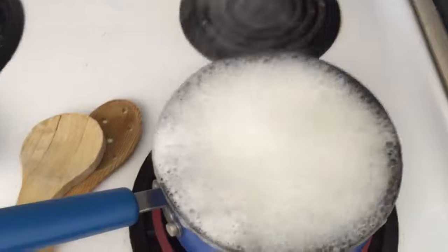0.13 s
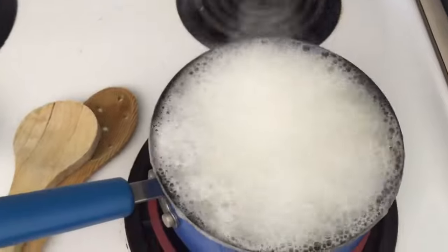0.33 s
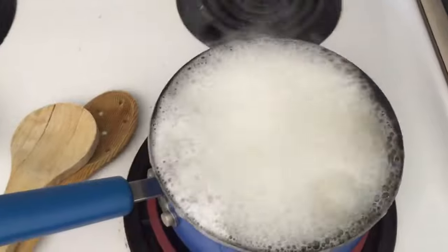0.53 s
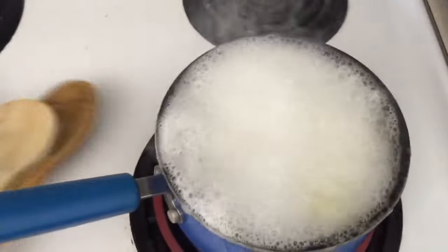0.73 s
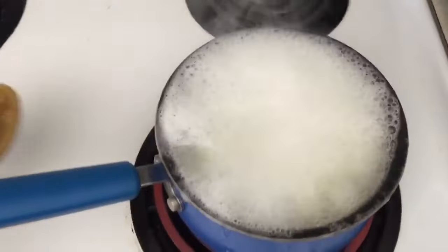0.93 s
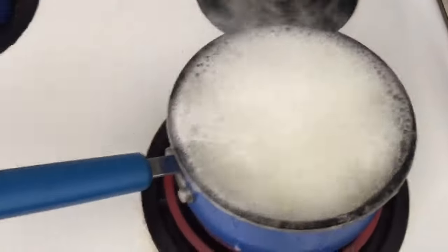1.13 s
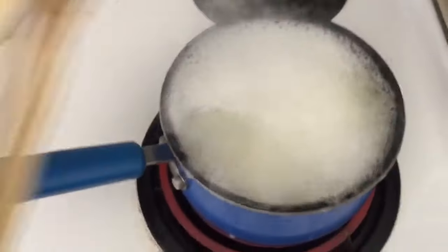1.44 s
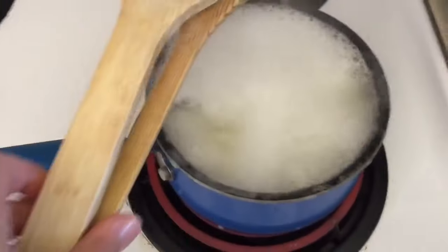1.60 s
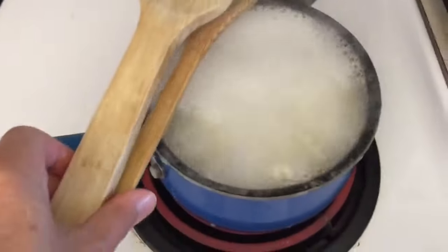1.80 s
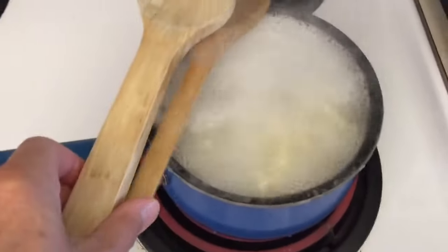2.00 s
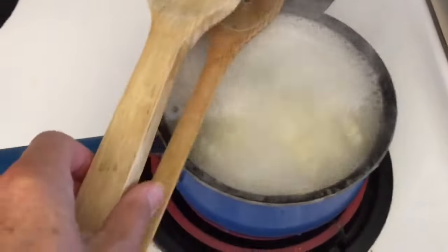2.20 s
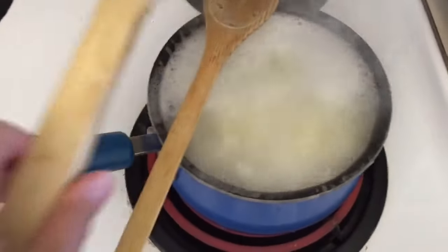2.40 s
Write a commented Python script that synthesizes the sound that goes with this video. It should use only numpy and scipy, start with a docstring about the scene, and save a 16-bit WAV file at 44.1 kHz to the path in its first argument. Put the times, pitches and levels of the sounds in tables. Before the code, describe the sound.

Hissing, fizzing pot on a stove, with a wooden spoon clack and a sharp rim knock.

```python
"""Foaming pot and wooden spoons

A pot of foaming liquid hisses with bursting bubbles and quietens as the foam sinks; under it an electric stove
hums and a fan whirs. Two wooden spoons scrape and clack on the stove top as they are picked up, then one knocks
down on the rim of the pot, and wood and pot ring briefly. A small kitchen answers the spoons; the sound is
close and mono."""
import sys
import numpy as np
from scipy import signal
from scipy.fft import rfft, irfft, next_fast_len
from scipy.io import wavfile
from scipy.ndimage import map_coordinates

SR = 44100
rng = np.random.default_rng(int(sys.argv[2]) if len(sys.argv) > 2 else 0)


def to_wav(s):
    """Save 16-bit WAV."""
    ch = np.atleast_2d(s).T  # columns
    pcm = np.round(np.clip(ch, -1, 1) * 32767)  # PCM
    wavfile.write(sys.argv[1], SR, pcm.astype(np.int16))


N = 112454

# The kitchen's decay. Each row: frequency in Hz, time to fall 60 dB in seconds.
ROOM_DECAY = [(150, 0.69), (1000, 0.34), (3000, 0.26), (10000, 0.14)]
# The fan's whine. Each row: pitch in Hz, rms level in dB.
FAN_WHINE = [(203, -61.5), (557, -64.5), (1115.5, -61.5)]
# Fades for the hum, its octave, the foam and the fizz. Each row: time in seconds, level in dB.
HUM_FADE = [(.12, -39), (.55, -38), (.68, -40), (.85, -37.5), (1.15, -38), (1.62, -36), (1.72, -38),
            (1.765, -56), (1.82, -56), (1.93, -52.5), (1.98, -73), (2.55, -73)]
OCTAVE_FADE = [(.12, -55), (.3, -55), (.55, -51.5), (.7, -57.5), (.95, -52.5), (1.35, -51.5), (1.55, -62),
               (2.4, -60.5)]
FOAM_FADE = [(.12, -39.5), (.5, -41.5), (.68, -41), (.85, -43.5), (1.15, -44.5), (1.4, -48), (1.6, -51),
             (1.8, -53.5), (2.1, -52), (2.36, -56), (2.55, -58)]
FIZZ_FADE = [(.12, -39.5), (.5, -40.5), (.75, -42), (1.15, -41.5), (1.4, -43), (1.6, -44.5), (1.8, -48),
             (2.1, -48), (2.36, -50), (2.55, -50)]
# EQ curves for the noise in each layer. Each row: frequency in Hz, relative level in dB.
FAN_EQ = [(20, -12), (50, -4), (110, 3), (180, 1), (260, -1), (380, -3.5), (480, -10), (570, -7),
          (740, -11), (860, -15.5), (970, -22.5), (1130, -1.5), (1400, -45.5), (2000, -11), (4000, -46)]
FOAM_EQ = [(200, -14.5), (520, -14.5), (650, -5.5), (760, -13.5), (880, -4.5), (990, -9), (1200, -5.5),
           (1550, -6.5), (1950, 1), (2250, -1.5), (2850, -7.5), (3400, -4), (4000, -8.5), (4420, -6),
           (5100, -14), (7000, -24), (16000, -40)]
FIZZ_EQ = [(1500, -16.5), (3500, -10), (5000, -5), (5600, 0), (6100, 0), (6900, 0), (7700, -4),
           (8400, -1.5), (9500, -2), (10350, -7), (11100, -3), (13000, -4), (15700, -6)]
SCRAPE_EQ = [(60, -19), (150, 4), (280, 2), (400, 4), (600, -0.5), (880, 0.5), (1150, 0), (1600, -0.5),
             (2200, -10), (3200, -19), (4200, -23), (5200, -30), (15000, -60)]
CLACK_EQ = [(60, -25), (160, -12.5), (420, -5), (680, -2.5), (1200, 4.5), (1800, 4.5), (2600, -4),
            (3600, -13), (5000, -22), (15000, -46)]
KNOCK_EQ = [(100, -28), (400, -16), (900, -5.5), (1600, -11), (2500, -4.5), (3200, -8), (3700, -6),
            (4400, -7), (5100, -17), (6000, -10), (7000, -15), (7700, -20), (8600, -17.5), (10000, -24.5),
            (15500, -36)]
# The ring of spoon on stove top, and of spoon and pot together. Each row: pitch in Hz, relative level in dB,
# time to fall 60 dB in seconds.
WOOD_MODES = [(409, -18, 0.19), (494, -24, 0.25), (840, -7, 0.063), (995, -17, .1), (1120, -14, .12),
              (1176, -10.5, 0.092), (1290, -7.5, 0.029), (1496.4, -3, .11), (1754, -12, .1),
              (1946, -26, .08), (2449, -12, 0.065), (2790, -23, .04), (3205, -16, 0.057)]
RIM_MODES = [(383.5, -27, 0.34), (880, -16, 0.24), (1022, -27, 0.23), (1280, -30, 0.071), (1550, -23, 0.24),
             (1833, -19.5, 0.22), (2233, -21, 0.16), (2320, -28, 0.04), (2610, -20, 0.032),
             (2960, -16, .07), (3148, -16, 0.16), (4200, -20, 0.1), (6950, -17, 0.038), (8800, -22, 0.029)]
# Wood sliding and chattering. Each row: start in seconds, length in seconds, level in dB,
# resonance in Hz, its half-width in Hz, its level over the rasp in dB.
SCRAPE_CUES = [(0.541, 0.045, -47, 413, 200, -4), (.935, 0.067, -41.5, 167, 68, 12),
               (0.961, .07, -46.5, 1120, 120, -6), (1.032, 0.017, -38, 3400, 710, 11),
               (1.028, 0.034, -39, 410, 120, 13), (1.053, 0.059, -49, 467, 150, -5),
               (1.988, .06, -47, 410, 250, -3), (2.049, .012, -41.5, 900, 90, 26),
               (2.187, 0.086, -35, 892, 60, -2), (2.245, 0.067, -43.5, 1000, 400, -8)]
# Spoon against stove top. Each row: start in seconds, level in dB, brightness in dB per octave.
CLACK_CUES = [(0.9132, -16, 0), (0.9188, -26, -5.5), (0.9268, -27, -2), (0.9499, -32, 11)]
# Spoon against rim. Each row: start in seconds, level in dB, brightness in dB per octave,
# contact pitch in Hz, contact level in dB.
KNOCK_CUES = [(2.0025, -34, -3, 1000, -35), (2.0504, -37.5, -1, 1260, -28.5), (2.1701, -13.5, 1, 2460, -14),
              (2.2245, -33.5, -2, 1570, -26)]


def amp(db):
    """Decibels to gain."""
    return 10 ** (np.asarray(db) / 20)


def unit(x):
    """Scale to rms 1."""
    return x / np.sqrt(np.mean(x ** 2) + 1e-20)


def along(points, hz):
    """Read a curve of (Hz, value) points on a log frequency axis."""
    freqs, values = np.transpose(points)
    return np.interp(np.log(hz + 1), np.log(freqs + 1), values)


def fade(rows):
    """Turn (seconds, dB) points into a gain for each sample."""
    return amp(np.interp(np.arange(N) / SR, *np.transpose(rows)))


def wobble(rate):
    """A smooth drift through `rate` random values a second."""
    return map_coordinates(rng.standard_normal(400), [np.arange(N) * rate / SR], mode="wrap")


def filtered(x, response):
    """Filter x by a gain given as a function of Hz."""
    n = x.shape[-1]
    padded = next_fast_len(n + 8192)
    return irfft(rfft(x, padded) * response(np.fft.rfftfreq(padded, 1 / SR)), padded)[..., :n]


def octaves(hz):
    """Roughly the octaves above 1500 Hz, the pivot of the brightness tilt."""
    return np.log2((hz + 100) / 1600)


def equalised(x, eq, tilt_db=0):
    """Shape x with an EQ curve and a tilt per octave, at rms 1."""
    return unit(filtered(x, lambda hz: amp(along(eq, hz) + tilt_db * octaves(hz))))


def add(track, start, sound):
    """Mix a sound into the track at a start time in seconds."""
    part = track[round(start * SR):][:len(sound)]
    part += sound[:len(part)]


def ticks(per_second, spread_db):
    """Random tiny clicks of scattered size, at rms 1."""
    size = amp(spread_db * np.minimum(rng.exponential(size=N), 5))
    return unit((rng.random(N) < per_second / SR) * size * np.sign(rng.standard_normal(N)))


def kitchen(x, wet_db):
    """The sound plus a room tail that builds up and dies sooner in the treble."""
    hz, t, noise = signal.stft(rng.standard_normal(SR // 2), SR, nperseg=256)
    decay = amp(-60 * t / along(ROOM_DECAY, hz)[:, None])
    build_up = 1 - np.exp(-t / 0.0075)
    tail = signal.istft(noise * decay * build_up, SR, nperseg=256)[1]
    return x + amp(wet_db) * signal.fftconvolve(x, tail / np.linalg.norm(tail))[:len(x)]


def fan(air_db=-52, waver_rad=0.71):
    """A steady rush of air with a few slightly unsteady tones."""
    t = np.arange(N) / SR
    whine = sum(amp(db + 1.5 * wobble(15)) * np.sin(2 * np.pi * hz * t + waver_rad * wobble(15))
                for hz, db in FAN_WHINE)
    air = amp(air_db) * equalised(rng.standard_normal(N), FAN_EQ)
    return np.sqrt(2) * whine + air


def stove_hum(hz=58.26, third_db=-24.5):
    """The stove's low hum, with a faint third harmonic and an octave that swells and fades."""
    phase = 2 * np.pi * hz * np.arange(N) / SR + 0.048 * wobble(7.3)
    body = np.sin(phase) + amp(third_db) * np.sin(3 * phase)
    return np.sqrt(2) * (fade(HUM_FADE) * body + fade(OCTAVE_FADE) * np.sin(2 * phase))


def bubbles(eq, flutter_db, pop_share=0.38):
    """Countless bursts merge into a hiss; the nearer pops stand out and carry a share of the power."""
    pops = np.sqrt(pop_share) * ticks(per_second=2500, spread_db=1.5)
    wash = np.sqrt(1 - pop_share) * rng.standard_normal(N)
    return equalised(pops + wash, eq) * amp(flutter_db * wobble(20))


def foaming_pot(echo_gain=0.084, echo_s=0.001392, drift_s=0.00007):
    """Coarse foam coloured by the pot, and fine fizz that dies away more slowly."""
    foam = fade(FOAM_FADE) * bubbles(FOAM_EQ, flutter_db=1.5)
    fizz = fade(FIZZ_FADE) * bubbles(FIZZ_EQ, flutter_db=0.78)
    hiss = foam + fizz
    # The reflection off the stove top shifts as the microphone sways.
    delay = (echo_s + drift_s * wobble(2.22)) * SR
    return hiss + echo_gain * map_coordinates(hiss, [np.arange(N) - delay])


def spoon_scrapes():
    """Wood drags over stove top and rim in quick small slips that ring one resonance of what it touches."""
    out = np.zeros(N)
    for start, length, db, centre_hz, half_width_hz, ring_db in SCRAPE_CUES:
        progress = np.clip((np.arange(N) / SR - start) / length, 0, 1)
        swell = np.sqrt(np.abs(np.sin(np.pi * progress)))
        slips = 0.5 * ticks(per_second=500, spread_db=-2.0) + rng.standard_normal(N)
        rasp = equalised(slips, SCRAPE_EQ)
        ring = unit(filtered(slips, lambda hz: 1 / (1 + 1j * (hz - centre_hz) / half_width_hz) ** 2))
        out += amp(db) * swell * unit(rasp + amp(ring_db) * ring)
    return kitchen(out, wet_db=-10.5)


def strike(modes, eq, tilt_db, noise_db, noise_t60, attack_s=0.00035):
    """One hit: ringing modes of alternating sign, and a noise burst for the dense, damped ones."""
    t = np.arange(SR // 2) / SR
    ring = np.zeros(len(t))
    for k, (hz, db, t60) in enumerate(modes):
        mode_db = db + rng.normal(0, 0.32) + tilt_db * octaves(hz)
        ring += (-1) ** k * amp(mode_db - 60 * t / t60) * np.sin(2 * np.pi * hz * t)
    burst = amp(noise_db - 60 * t / noise_t60) * equalised(rng.standard_normal(len(t)), eq, tilt_db)
    return (ring + burst) * (1 - np.exp(-t / attack_s))


def spoon_clacks():
    """The spoons clack against the stove top and rattle as they are lifted."""
    out = np.zeros(N)
    for start, db, tilt_db in CLACK_CUES:
        clack = strike(WOOD_MODES, CLACK_EQ, tilt_db, noise_db=-2.5, noise_t60=0.062)
        add(out, start, amp(db) * kitchen(clack, wet_db=-14.5))
    return out


def rim_knocks(snap_db=-6.5, snap_t60=0.0014, contact_t60=0.008):
    """A spoon touches the rim twice, then lands with a hard, bright crack and bounces."""
    out = np.zeros(N)
    t = np.arange(SR // 2) / SR
    for start, db, tilt_db, contact_hz, contact_db in KNOCK_CUES:
        snap = amp(db + snap_db - 60 * t / snap_t60) * rng.standard_normal(len(t))
        contact = amp(contact_db - 60 * t / contact_t60) * np.sin(2 * np.pi * contact_hz * t)
        ring = amp(db) * strike(RIM_MODES, KNOCK_EQ, tilt_db, noise_db=-3, noise_t60=0.023)
        add(out, start, kitchen(snap + contact + ring, wet_db=-10.5))
    return out


def scene():
    """The spoons over a bed of pot, stove and fan, the same in both channels."""
    bed = foaming_pot() + stove_hum() + fan()
    return np.tile(bed + spoon_clacks() + rim_knocks() + spoon_scrapes(), (2, 1))


def record(dry):
    """The mix cuts in after a moment of silence, with the very top of the treble removed."""
    start_s, top_hz = 0.1195, 15820
    gate = np.arange(N) / SR >= start_s
    return filtered(dry * gate, lambda hz: hz < top_hz)


dry = scene()
out = record(dry)
to_wav(out)
```